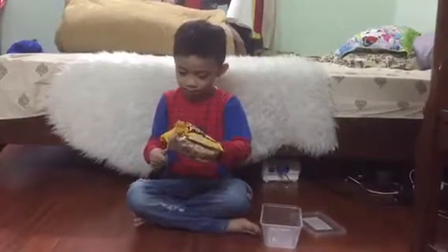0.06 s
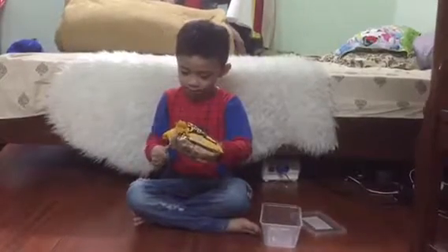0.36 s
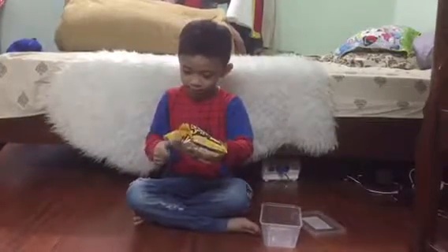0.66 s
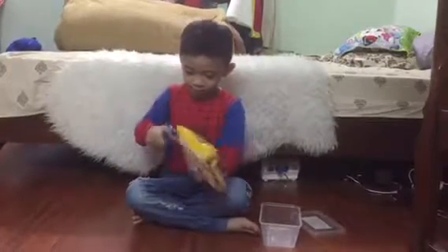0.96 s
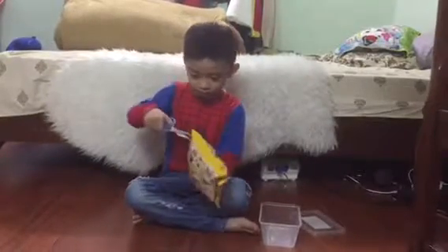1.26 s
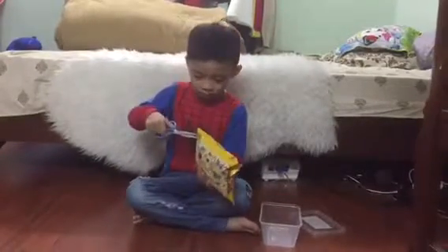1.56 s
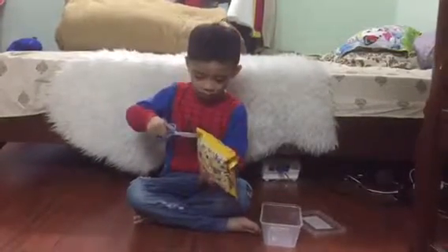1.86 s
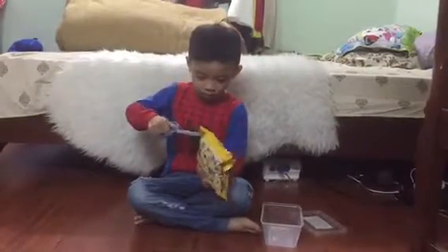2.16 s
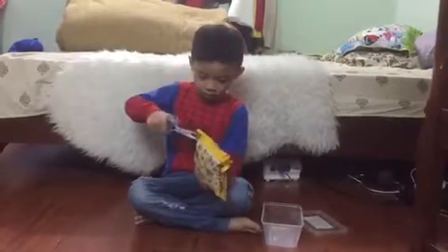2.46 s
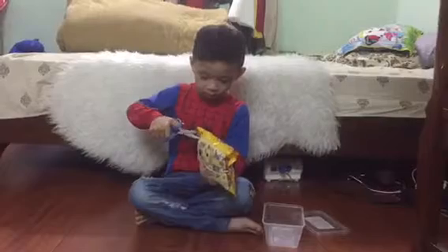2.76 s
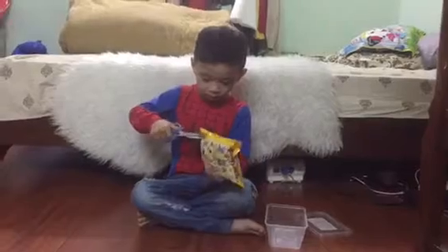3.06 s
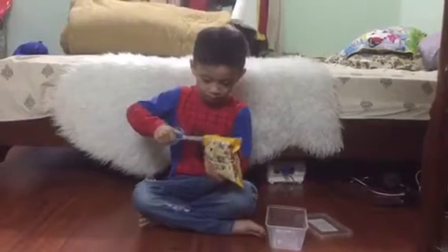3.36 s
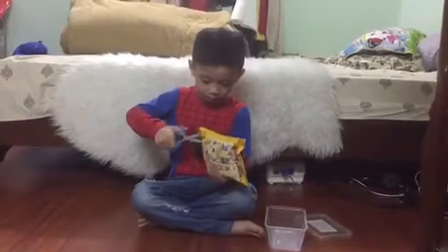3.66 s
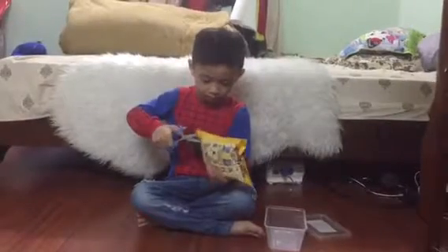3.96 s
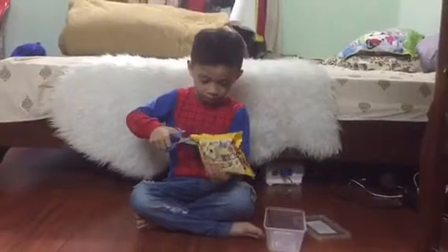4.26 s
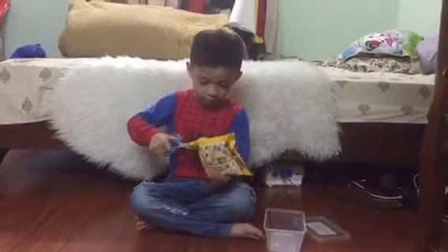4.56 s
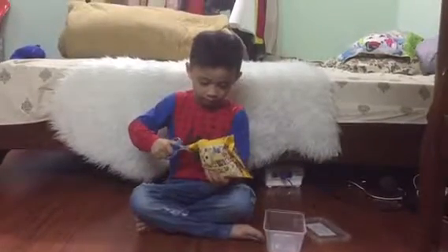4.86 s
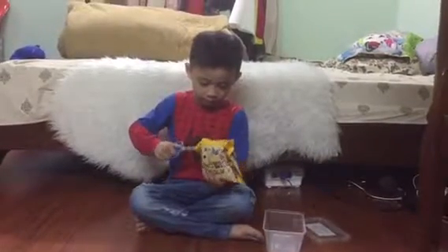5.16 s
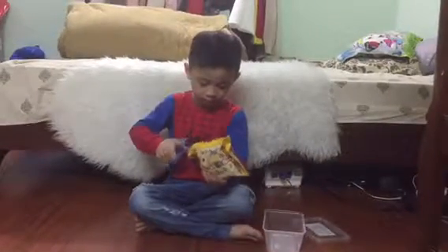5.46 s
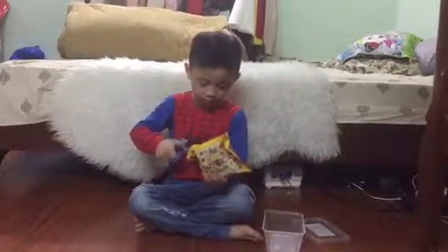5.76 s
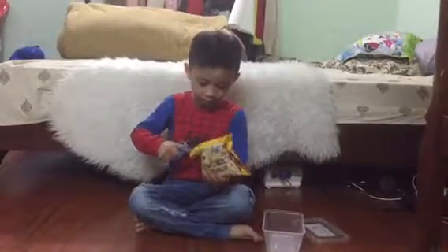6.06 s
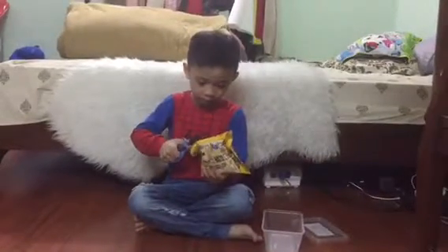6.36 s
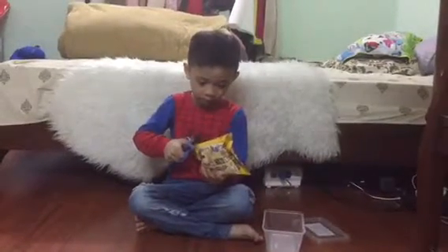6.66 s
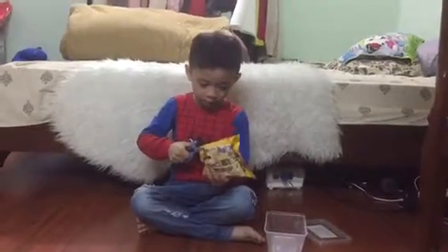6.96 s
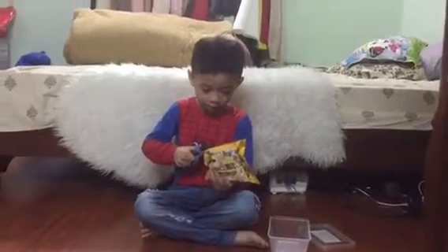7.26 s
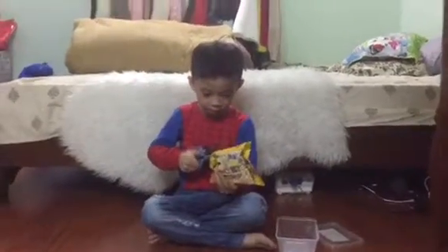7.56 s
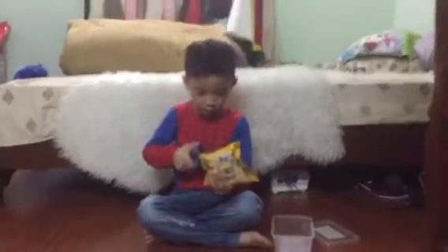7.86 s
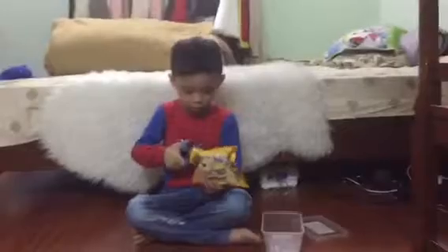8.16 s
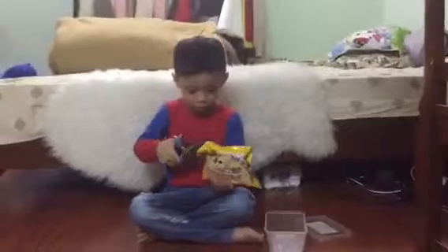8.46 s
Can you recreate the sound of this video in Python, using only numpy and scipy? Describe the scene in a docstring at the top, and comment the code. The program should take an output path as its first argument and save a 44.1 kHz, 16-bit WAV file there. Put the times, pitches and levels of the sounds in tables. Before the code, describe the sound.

In a small bedroom with a brief echo and a quiet low rumble, a snack bag crinkles and snaps as it is handled, heard from a couple of metres away. It bumps softly as it turns, then scissors bite into it with separate sharp cracks, loudest around the middle. Foil rustles and small pops fill the gaps, and two quick snips near the end give way to lighter crinkling.

```python
"""A close-packed foil rustle and a few sharp snaps: a snack bag turns in one hand, then scissors snip it.
Each move of the hand raises a swell of fine crinkles in which creases buckle in single snaps;
each hard cut cracks, rings the blades and thumps the air-filled bag like a drum.
One microphone, a couple of metres away in a small bedroom with a hard floor.
The room rings briefly after every snap, over a low building rumble."""
import sys
import numpy as np
from scipy import signal
from scipy.fft import rfft, irfft
from scipy.io import wavfile

SR = 44100
rng = np.random.default_rng(int(sys.argv[2]) if len(sys.argv) > 2 else 0)


def dump_mix(stems):
    """Bounce the given channels to the path in sys.argv[1] as a 16-bit WAV at rate SR."""
    frames = np.atleast_2d(stems).T  # one column per channel
    limited = np.clip(frames, -1, 1)  # hard clip at full scale
    pcm = np.round(limited * 32767).astype(np.int16)
    wavfile.write(sys.argv[1], SR, pcm)


N = 379260

# what crumpled foil radiates: f/Hz, spectral level/dB
FOIL_SPECTRUM = [(280, -0.5), (480, -1.5), (930, -3.5), (1100, -4), (1530, 0), (2380, -0.5), (2700, -3),
                 (3250, -3), (4100, -6.5), (4950, -8.5), (6050, -7), (7600, -13.5), (9700, -13),
                 (10400, -15.5), (11400, -12.5), (13000, -14), (16000, -20.5)]
# the foil's body, middle and treble bands: lower f/Hz, upper f/Hz
FOIL_BANDS = [(260, 1200), (1200, 4200), (4800, 17000)]
# rustle of the bag merely held: body/dB, middle/dB, treble/dB
HELD_DB = (-76, -89.5, -88)
# the hand slides and crumples the foil: t/s, hold/s, middle/dB, body/dB re middle, treble/dB re middle
HAND_MOVES = [(0.0, 0.081, -42.5, -8.5, -8), (.175, 0.017, -56, 0.5, 4), (.42, 0.014, -60.5, -3.5, -9),
              (0.783, 0.083, -46.5, -2.5, -8), (1.019, 0.064, -49.5, -13.5, -14),
              (1.168, 0.076, -47, -2, -5), (1.358, 0.094, -47.5, 5, -5.5), (1.631, 0.016, -56.5, -2, -33),
              (1.763, 0.0067, -52, -1, -3.5), (2.115, 0.023, -72, 5, -21), (2.19, 0.045, -56.5, 8, -4),
              (2.557, 0.09, -55, 3, -11.5), (2.71, 0.019, -54.5, 7.5, 0.5), (2.91, 0.025, -57.5, 0, -11),
              (2.99, 0.061, -53, -0.5, -15), (3.14, 0.007, -58, 4.5, -9), (3.345, 0.012, -56, -13, 4),
              (3.42, 0.085, -46, -4, -7), (3.758, 0.031, -48, -1, -14), (4.084, 0.026, -55, -15, -8.5),
              (4.3, 0.038, -69.5, -11, -13), (4.39, 0.075, -53.5, -4.5, -13), (4.655, 0.01, -55, -34, 3.5),
              (5.11, 0.03, -57, -5, -10), (5.22, 0.068, -45.5, -2.5, -5), (5.521, 0.022, -48.5, -16, -9.5),
              (5.561, 0.019, -48.5, -1.5, -9), (5.9, 0.033, -59.5, 6.5, -12.5),
              (6.119, 0.072, -45.5, -5, -7.5), (6.482, 0.039, -44, -8.5, -8), (6.6, .03, -49.5, -8.5, -8),
              (6.925, 0.013, -56, -16, -18), (7.06, 0.024, -64, -20, -15), (7.439, 0.16, -44.5, -10, -8),
              (7.803, 0.0086, -44.5, -3.5, -7.5), (8.03, 0.009, -72, 4, -14), (8.14, 0.11, -65.5, -2.5, -7),
              (8.35, 0.068, -65.5, -3, -3.5), (8.5, 0.047, -59.5, 0.5, -4)]
# the quiet bedroom: f/Hz, relative spectral level/dB
ROOM_TONE = [(18, -58), (40, -5), (52, -9), (76, -3), (93, 3.5), (125, -4), (165, -14), (270, -13.5),
             (450, -30), (820, -29.5), (1600, -26.5), (3000, -35.5), (5000, -40), (16000, -46.5)]
# single creases buckle: t/s, middle/dB before beaming, f/Hz, treble/dB re middle
CREASES = [(.037, -39.5, 2360, 0.5), (0.1651, -39, 1780, -6.5), (.373, -59.5, 2970, -8),
           (.487, -60.5, 2720, -21), (0.757, -41, 3220, -14), (0.8244, -30.5, 1430, -10.5),
           (1.102, -48, 2710, 0), (1.2138, -34.5, 2200, -6.5), (1.3452, -41, 1920, -9),
           (1.3823, -37.5, 2190, -12), (1.434, -39.5, 2030, -9), (1.6986, -47.5, 2780, -8.5),
           (1.7708, -41.5, 2150, -8), (2.4698, -53, 1340, -12.5), (2.5653, -51.5, 2970, -4),
           (2.656, -41.5, 1720, -10.5), (2.6873, -35.5, 2700, -4), (2.8895, -40, 2560, -13.5),
           (2.955, -49, 2200, -5), (3.0916, -37.5, 2780, -11.5), (3.2948, -48.5, 1480, 8.5),
           (3.712, -47, 1640, -18), (3.7683, -49.5, 1580, -8), (3.816, -45.5, 1550, -29),
           (3.8595, -50, 1980, -34), (3.969, -49, 1760, -20), (4.383, -44.5, 1520, -19.5),
           (4.4283, -51.5, 1580, -7.5), (4.468, -49.5, 1570, -16), (4.586, -47, 1430, -16),
           (4.6454, -41.5, 1880, 1.5), (4.9135, -51, 1580, -17.5), (5.0351, -43.5, 1630, -9.5),
           (5.0765, -39, 1410, -9), (5.146, -52, 1760, -8), (5.5645, -35.5, 1330, -13.5),
           (5.778, -62.5, 1540, -29), (5.8639, -52, 1440, -25), (5.9255, -45, 2920, -7.5),
           (6.001, -36, 1640, -15), (6.158, -42, 1700, -8.5), (6.1726, -38, 1290, -4.5),
           (6.388, -54.5, 2060, 0.5), (6.4657, -37, 1160, -10.5), (6.527, -43.5, 1960, -6),
           (6.6008, -46, 3340, -4), (6.7148, -38, 2950, -8), (6.8543, -45.5, 2140, -11.5),
           (6.9, -45, 2020, -26), (6.925, -51.5, 1500, -26), (7.1252, -44.5, 2960, -13),
           (7.3177, -40.5, 3900, -8), (7.6393, -45, 1750, -6), (7.7203, -47.5, 1500, 0.5),
           (7.7756, -42.5, 1770, -12), (7.8116, -36.5, 2180, -11.5), (8.035, -57.5, 1520, -12),
           (8.1786, -58, 1460, -21), (8.2203, -52, 1890, -14), (8.467, -52, 1130, -2),
           (8.4902, -45.5, 3420, -11), (8.525, -50, 3680, -8)]
# a crease sounds fuller the harder the bag is worked: rustle body/dB, snap body/dB re its middle
CREASE_BODY = [(-82, -19), (-59, -11.5)]
# standing resonances of the bedroom: f/Hz, gain/dB
ROOM_MODES = [(203, 6), (288, 0), (694, -22), (1104, 10), (1260, 8.5), (1532, 6.5), (1642, 1), (1983, 0),
              (2402, -0.5), (4599, -1)]
# decay of the bedroom's echoes: f/Hz, t60/s
ROOM_T60 = [(100, 0.36), (400, 0.22), (1200, 0.38), (2800, 0.36), (7000, 0.39), (15000, 0.2)]
# a panel of the bag pops in or out: t/s, level/dB, f/Hz
PANEL_POPS = [(0.825, -42.5, 755), (.878, -49, 740), (1.72, -55, 1100), (2.098, -60, 644),
              (2.708, -43, 845), (2.757, -49, 786), (3.895, -54, 660), (4.106, -58.5, 1080),
              (7.889, -54, 840), (8.048, -59.5, 680)]
# the bag is jolted as it turns: t/s, level/dB
JOLTS = [(.826, -55), (1.388, -40), (1.413, -41), (2.7, -58)]
# modes of the air-filled bag: f/Hz, relative level/dB, t60/s
BAG_MODES = [(85.6, -12.5, 0.066), (121, -9.5, 0.064), (185, 1, 0.0228), (234.6, 0.5, 0.03),
             (288, -7.5, 0.037), (430, -5.5, 0.018)]
# the blades bite through and shut:
# t/s, crack/dB before beaming, f/Hz, treble/dB re crack, bag thump/dB, blade ring/dB
CUTS = [(2.1931, -33.5, 1490, -9.5, -37.5, -54), (3.3848, -24, 1180, -3.5, -29, -53),
        (5.1956, -21, 2380, -5, -38.5, -56), (6.0192, -25, 2040, -4.5, -40.5, -59),
        (7.433, -30.5, 1470, -3, -39, -62), (7.5087, -28.5, 2980, -7, -39.5, -53)]
# modes of the steel blades: f/Hz, relative level/dB, t60/s
BLADE_MODES = [(5200, 7, 0.32), (6160, -4, .12), (7000, -16, .12), (11200, 1.5, 0.074)]
# thin ticks of the taut film: t/s, level/dB
FILM_TICKS = [(2.953, -59), (3.187, -63), (7.0088, -51), (7.0615, -53), (7.088, -56), (7.1898, -55)]

CUTOFF_HZ = 16200


def from_db(db):
    """Decibels to gain."""
    return 10 ** (np.asarray(db) / 20)


def unit_energy(x):
    """Scale so that the squares sum to one."""
    return x / np.sqrt(np.sum(x ** 2) + 1e-20)


def at_hz(points, hz):
    """Read a table on a log-frequency axis."""
    table_hz, values = np.transpose(points)
    return np.interp(np.log(hz + 1e-9), np.log(table_hz), values)


def band(x, edges_hz):
    """Band-pass between two edges."""
    return signal.sosfilt(signal.butter(4, edges_hz, "band", fs=SR, output="sos"), x)


def resonance(x, hz, q):
    """One mode: a stiff facet of foil between creases, or a standing wave in the room."""
    return signal.lfilter(*signal.iirpeak(hz, q, fs=SR), x)


def add(track, s, level_db, sound):
    """Lay in a short sound with the energy of 20 ms at the given rms level."""
    start = max(round(s * SR), 0)
    part = (from_db(level_db) * np.sqrt(SR / 50) * unit_energy(sound))[:N - start]
    track[start:start + len(part)] += part


def crack(envelope, evenness):
    """A burst of tiny clicks, so many that its spectrum is partly evened out."""
    spectrum = rfft(envelope * rng.standard_normal(len(envelope)))
    return irfft(spectrum / (np.abs(spectrum) + 1e-9) ** evenness) * envelope ** 0.18


def struck(blows, modes, detune=0, size=8192):
    """Every blow rings a set of damped modes, in alternating signs."""
    out, t = np.zeros(N), np.arange(size) / SR
    hz, mode_db, t60 = np.transpose(modes)[:, :, None]
    for s, level_db in blows:
        shifted_hz = hz * (1 + detune * rng.standard_normal(hz.shape))
        rings = from_db(mode_db - 60 * t / t60) * np.sin(2 * np.pi * shifted_hz * t)
        add(out, s, level_db, rings[::2].sum(0) - rings[1::2].sum(0))
    return out


def foil_responses(size=512):
    """The foil's answer to one click, split into body, middle and treble."""
    hz = np.arange(size + 1) * SR / (2 * size)
    cepstrum = irfft(np.log(from_db(at_hz(FOIL_SPECTRUM, hz))))
    causal = np.r_[cepstrum[0], 2 * cepstrum[1:size]]   # minimum phase
    click = irfft(np.exp(rfft(causal, 2 * size)))[:size]
    return [band(click, edges) for edges in FOIL_BANDS]


def handling_gains(swell_db_per_s=469, settle_db_per_s=213):
    """Rustle strength per band: each move swells, holds and settles, adding power to the held bag's."""
    t = np.arange(N) / SR
    power = from_db(HELD_DB)[:, None] ** 2 * np.ones(N)
    for s, hold_s, level_db, body_db, treble_db in HAND_MOVES:
        near = (t > s - .5) & (t < s + hold_s + .5)
        before_s, after_s = np.maximum(s - t[near], 0), np.maximum(t[near] - s - hold_s, 0)
        swell = from_db(level_db - swell_db_per_s * before_s - settle_db_per_s * after_s)
        power[:, near] += np.outer(from_db([body_db, 0, treble_db]), swell) ** 2
    return np.sqrt(power)


def rustle(responses, crinkles_per_s=330, spread_db=4.5, ring_db=11, q=22, friction_db=-10, facets=14):
    """Countless crinkles, each ringing one facet, over the hiss of film rubbing on film."""
    sizes = from_db(spread_db * np.minimum(rng.exponential(1, N), 4)) * rng.choice([-1, 1], N)
    clicks = sizes * (rng.random(N) < crinkles_per_s / SR)
    facet_hit = rng.integers(0, facets, N)
    facet_hz = np.geomspace(600, 3600, facets)
    rings = sum(resonance(clicks * (facet_hit == k) + 1e-18, hz, q) for k, hz in enumerate(facet_hz))
    friction = from_db(friction_db) * clicks.std() * rng.standard_normal(N)
    drive = clicks + from_db(ring_db) * rings + friction
    return sum(np.sqrt(N) * unit_energy(signal.oaconvolve(drive, response)[:N]) * gain
               for response, gain in zip(responses, handling_gains()))


def room_tone(level_db=-55.5, swell_db=3, rumble_edge_hz=150, knots=110):
    """Low building rumble that swells and sinks, with a faint steady hiss above it."""
    colour = from_db(at_hz(ROOM_TONE, np.arange(N // 2 + 1) * SR / N))
    noise = np.sqrt(N) * unit_energy(irfft(rfft(rng.standard_normal(N)) * colour, N))
    rumble = signal.sosfiltfilt(signal.butter(2, rumble_edge_hz, fs=SR, output="sos"), noise)
    swell = np.interp(np.arange(N), np.linspace(0, N, knots), rng.standard_normal(knots))
    return from_db(level_db) * (noise + rumble * (from_db(swell_db * swell) - 1))


def creases_and_cuts(cut_body_db=-3, body_per_thump=0.55):
    """Give each snap its body: fuller when the hand works the bag or the cut shakes it harder."""
    worked_db = 20 * np.log10(handling_gains()[0])
    creases = [(s, db, hz, np.interp(worked_db[int(s * SR)], *np.transpose(CREASE_BODY)), treble_db)
               for s, db, hz, treble_db in CREASES]
    cuts = [(s, db, hz, cut_body_db + body_per_thump * (thump_db - db), treble_db)
            for s, db, hz, treble_db, thump_db, _ in CUTS]
    return creases + cuts


def snaps(responses, rise_s=0.00081, fall_s=0.00092, body_stretch=3.8, foot_db=-18, foot_s=0.024,
          q=4.1, size=1024):
    """Each snap is an avalanche of tiny buckles; returns its sound at the microphone and into the room."""
    direct, into_room, lead = np.zeros(N), np.zeros(N), size // 4
    t = (np.arange(size) - lead) / SR
    # the film strains before a loud snap, and settles after any
    foot = from_db(foot_db) * np.exp(-np.abs(t) / (foot_s * np.where(t < 0, .5, 1)))
    for s, level_db, hz, body_db, treble_db in creases_and_cuts():
        # a small snap rings one facet and beams its sound; a loud one runs longer, over many facets
        force = np.interp(level_db, [-50, -22], [0, 1])
        stretch, ring_db, beam_db = 1 + 0.58 * force, 8 - 5 * force, 1.5 * (1 - force)
        for response, colour_db, width in zip(responses, (body_db, 0, treble_db), (body_stretch, 1, 1)):
            peak = np.exp(-np.abs(t) / (width * stretch * np.where(t < 0, rise_s, fall_s)))
            buckles = crack(peak + foot * np.where(t < 0, force, 1), evenness=.45)
            sound = np.convolve(buckles + from_db(ring_db) * resonance(buckles, hz, q), response)
            add(direct, s - lead / SR, level_db + colour_db + beam_db, sound)
            add(into_room, s - lead / SR, level_db + colour_db - beam_db, sound)
    return direct, into_room


def room_tail(onset_s=0.0015, spread_db=3, size=24000):
    """Dense uneven reflections that start at once and die away, each octave at its own rate."""
    t = np.arange(size) / SR
    echoes = rng.standard_normal(size) * from_db(spread_db * rng.standard_normal(size))
    spectrum, hz = rfft(echoes), np.arange(size // 2 + 1) * SR / size
    centres_hz, tail = 125 * 2 ** np.arange(8), np.zeros(size)
    for centre_hz, share in zip(centres_hz, np.eye(len(centres_hz))):
        octave = irfft(spectrum * at_hz(np.c_[centres_hz, share], hz), size)
        tail += octave * from_db(-60 * t / at_hz(ROOM_T60, centre_hz))
    return unit_energy(tail * np.clip(t / onset_s - .5, 0, 1))


def bedroom(x, echo_db=-1, mode_t60_s=0.32, stretches=12):
    """Standing waves and echoes; the bag keeps moving, so each stretch of time meets new reflections."""
    q_per_hz = np.pi * mode_t60_s / np.log(1000)
    out = sum(from_db(db) * resonance(x, hz, q_per_hz * hz) for hz, db in ROOM_MODES)
    for stretch in np.array_split(np.arange(N), stretches):
        start = stretch[0]
        echoes = signal.fftconvolve(x[stretch], room_tail())[:N - start]
        out[start:start + len(echoes)] += from_db(echo_db) * echoes
    return out


def panel_pops(swell_s=0.00118, size=1024):
    """A whole panel flips over with a soft, pitched pop."""
    out, t = np.zeros(N), np.arange(size) / SR
    for s, level_db, hz in PANEL_POPS:
        add(out, s - swell_s, level_db, t * np.exp(-t / swell_s) * np.sin(2 * np.pi * hz * t))
    return out


def bag_thumps():
    """The bag booms briefly at every jolt and cut; its pitch shifts a little with every new grip."""
    cut_blows = [(s, thump_db) for s, *_, thump_db, _ in CUTS]
    return struck(JOLTS + cut_blows, BAG_MODES, detune=0.087)


def blade_rings():
    """The steel rings as the scissors shut."""
    return struck([(s, ring_db) for s, *_, ring_db in CUTS], BLADE_MODES)


def film_ticks(fall_s=.0012, low_hz=7000, size=512):
    """The taut film slips by a hair: treble only."""
    out, t = np.zeros(N), np.arange(size) / SR
    for s, level_db in FILM_TICKS:
        slip = crack(np.exp(-t / fall_s), evenness=0.28)
        add(out, s - fall_s / 2, level_db, band(slip, (low_hz, CUTOFF_HZ)))
    return out


def scene(tick_room_db=-4):
    """Bag and scissors in the bedroom, in mono, a couple of metres from the microphone."""
    responses = foil_responses()
    snaps_direct, snaps_into_room = snaps(responses)
    handling = rustle(responses) + panel_pops() + bag_thumps() + blade_rings()
    ticks = film_ticks()
    room = bedroom(snaps_into_room + handling + from_db(tick_room_db) * ticks)
    return (snaps_direct + handling + ticks + room + room_tone())[None]


def record(dry):
    """A steep low-pass takes the very top off the microphone signal."""
    return signal.sosfilt(signal.ellip(10, .1, 80, CUTOFF_HZ, fs=SR, output="sos"), dry)


dry = scene()
out = record(dry)
dump_mix(out)
```